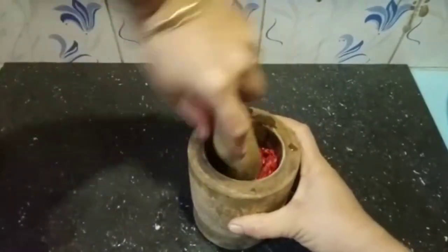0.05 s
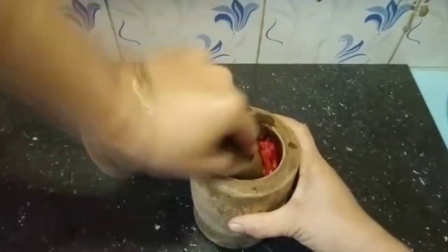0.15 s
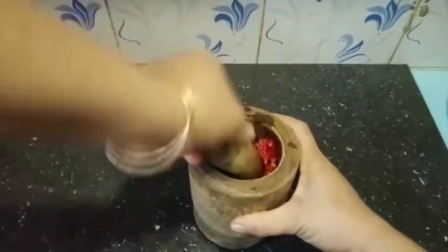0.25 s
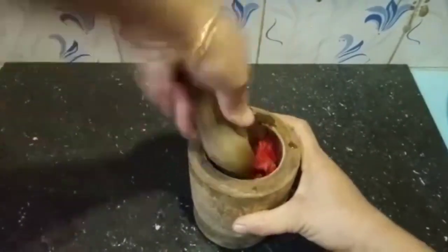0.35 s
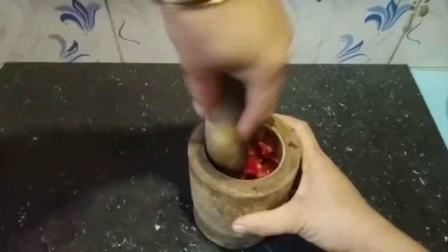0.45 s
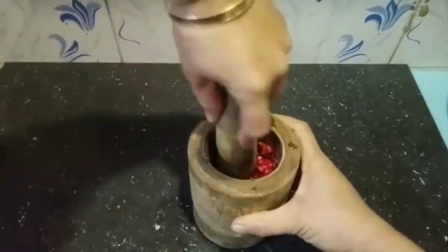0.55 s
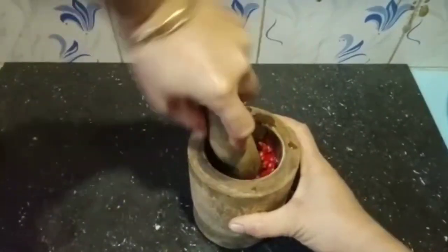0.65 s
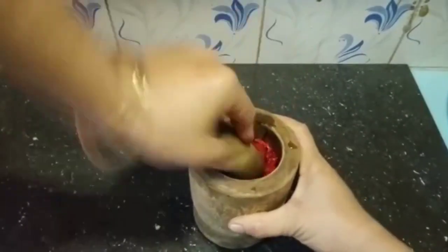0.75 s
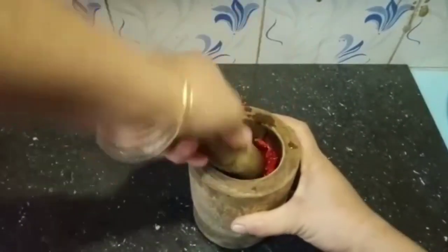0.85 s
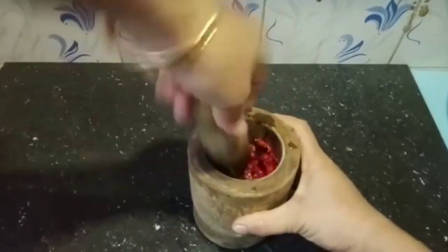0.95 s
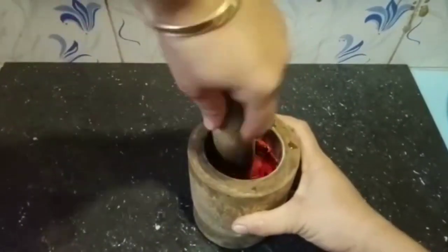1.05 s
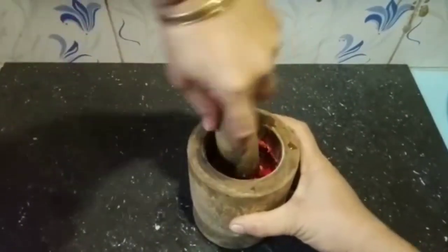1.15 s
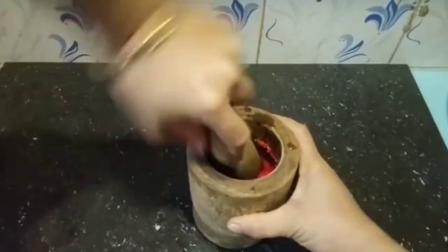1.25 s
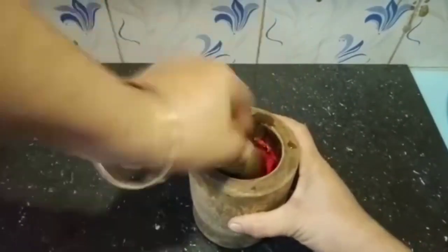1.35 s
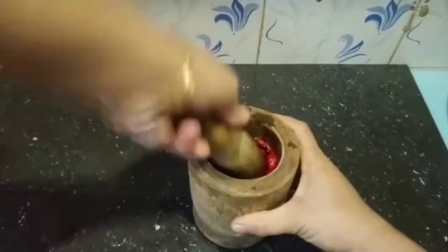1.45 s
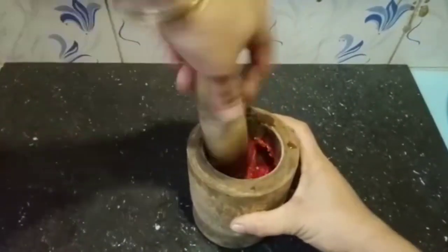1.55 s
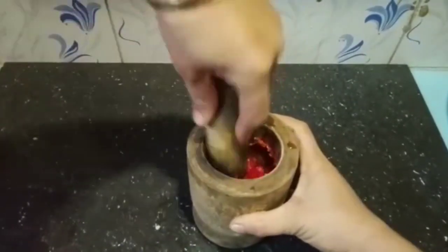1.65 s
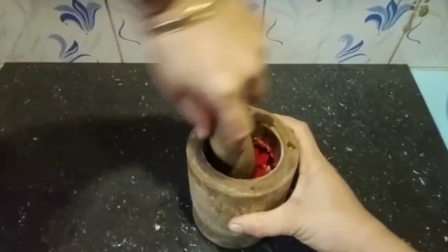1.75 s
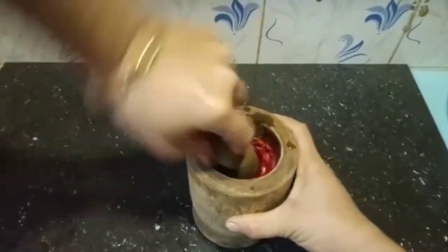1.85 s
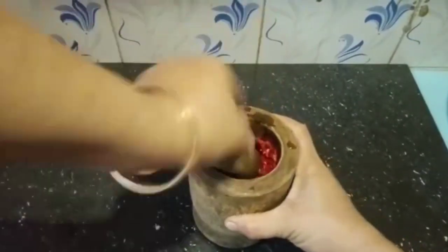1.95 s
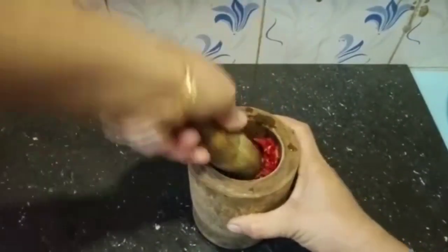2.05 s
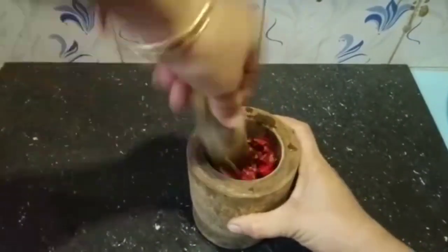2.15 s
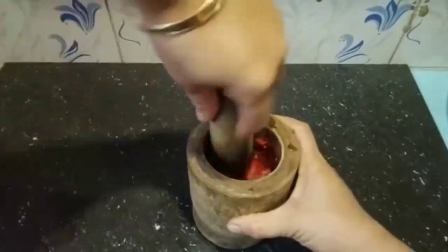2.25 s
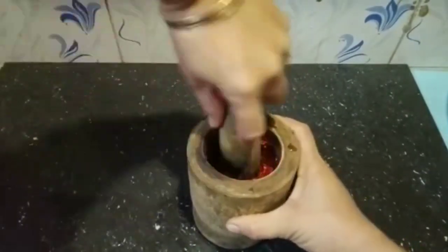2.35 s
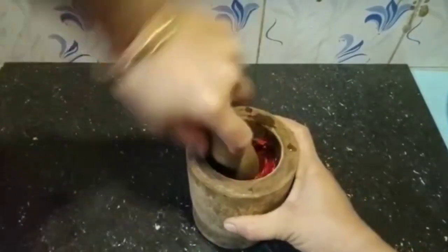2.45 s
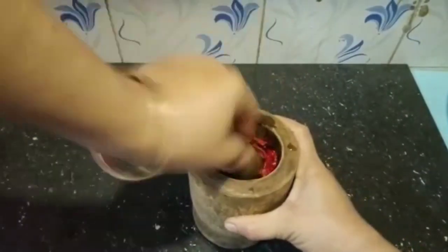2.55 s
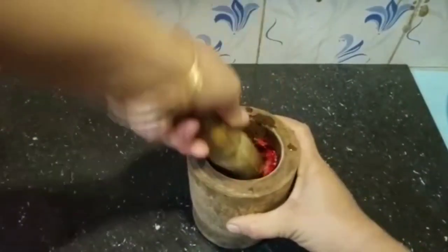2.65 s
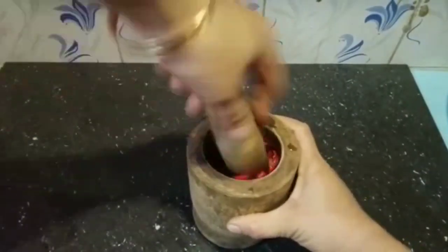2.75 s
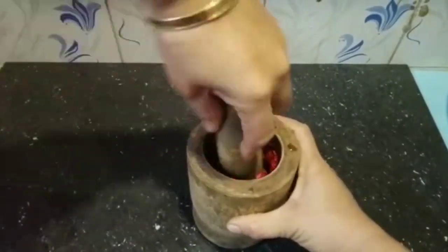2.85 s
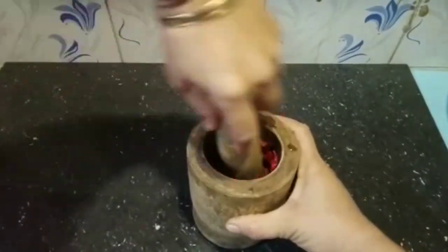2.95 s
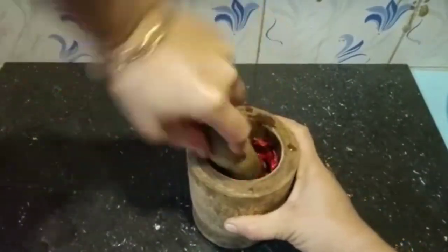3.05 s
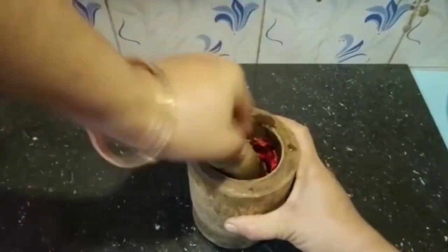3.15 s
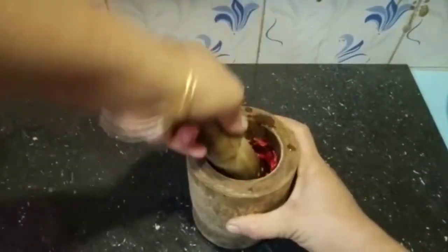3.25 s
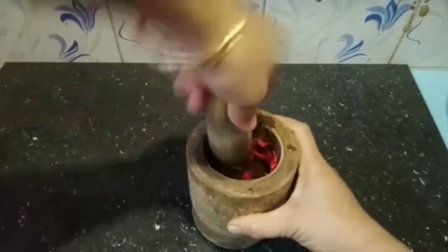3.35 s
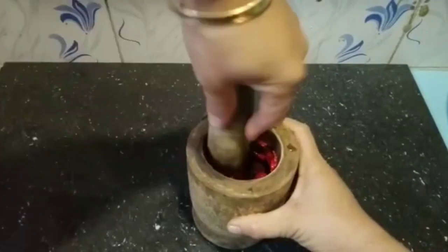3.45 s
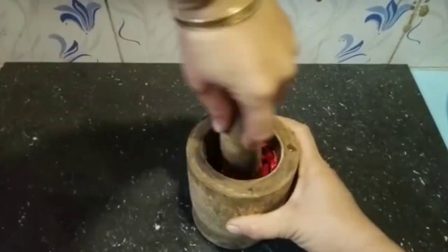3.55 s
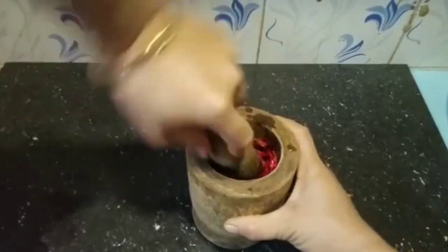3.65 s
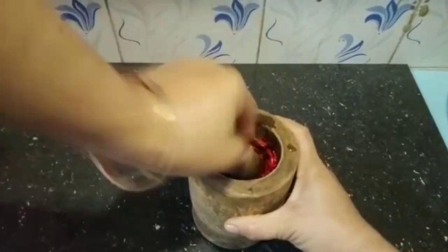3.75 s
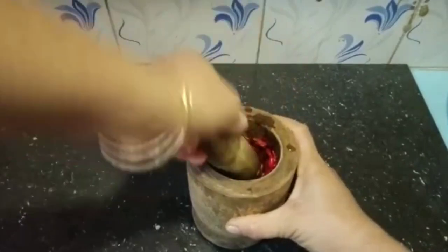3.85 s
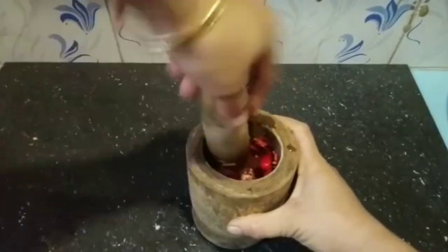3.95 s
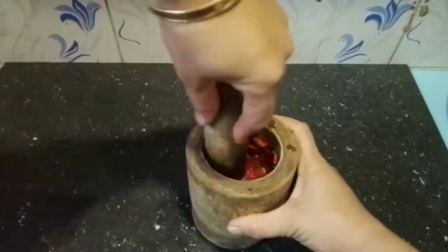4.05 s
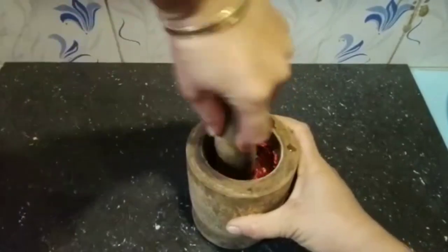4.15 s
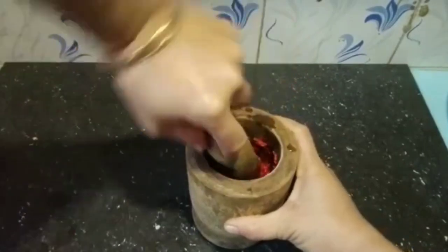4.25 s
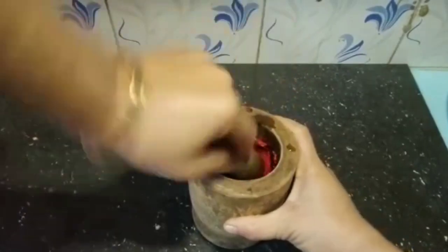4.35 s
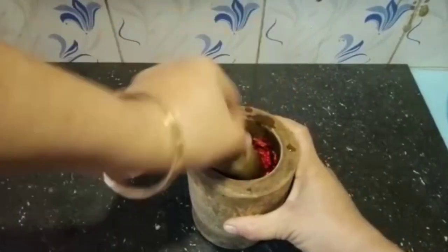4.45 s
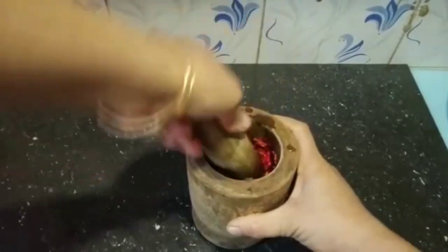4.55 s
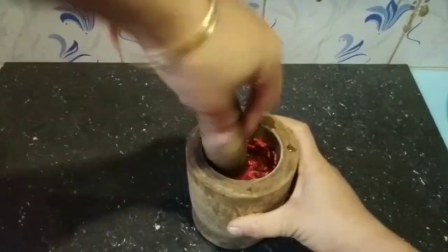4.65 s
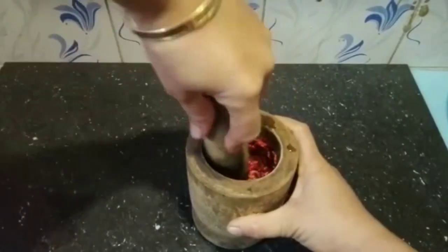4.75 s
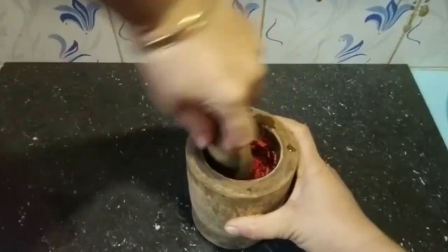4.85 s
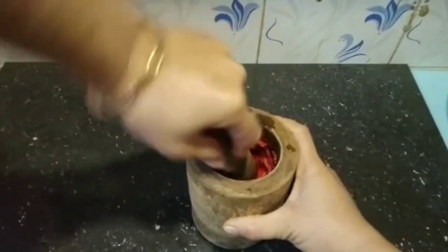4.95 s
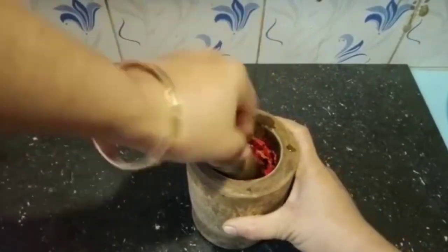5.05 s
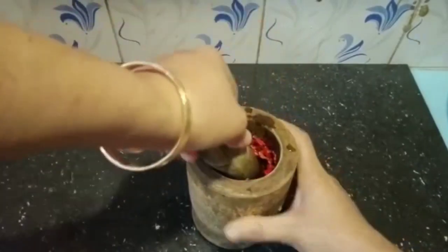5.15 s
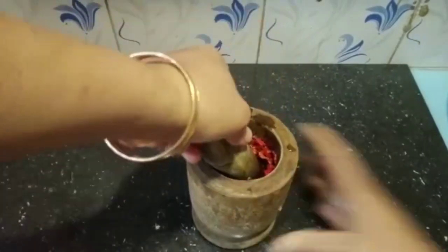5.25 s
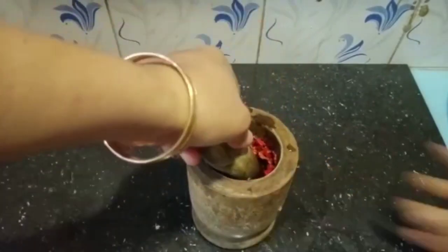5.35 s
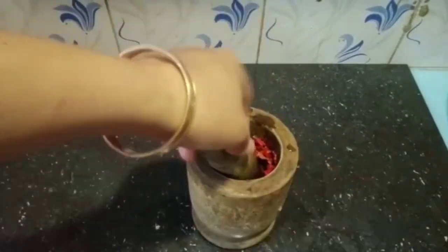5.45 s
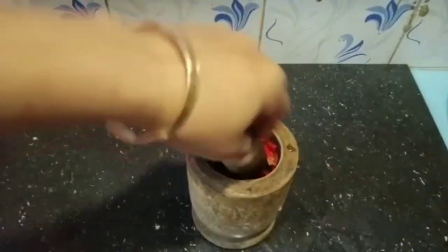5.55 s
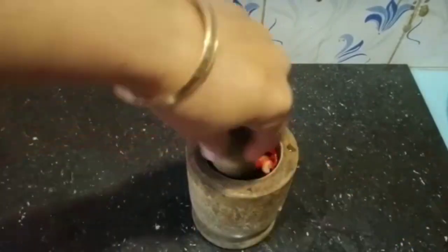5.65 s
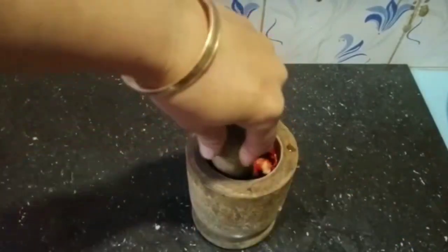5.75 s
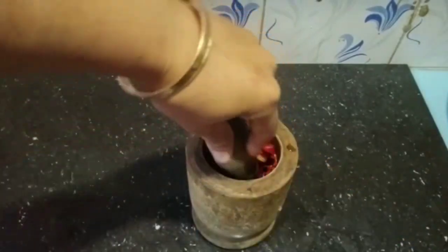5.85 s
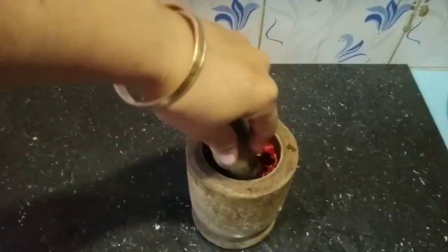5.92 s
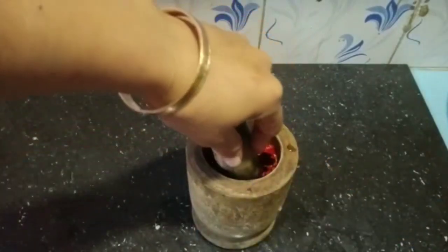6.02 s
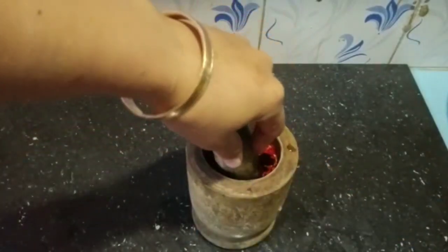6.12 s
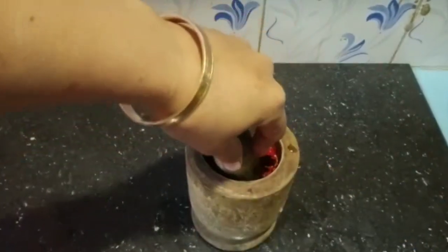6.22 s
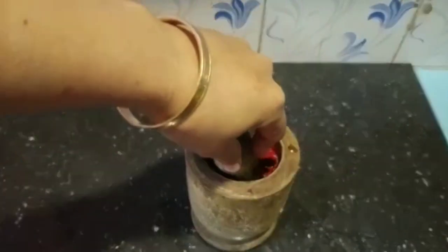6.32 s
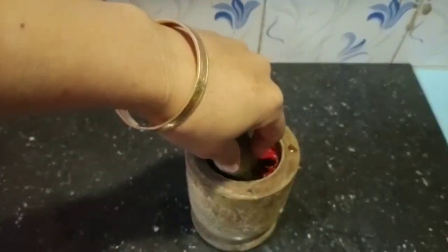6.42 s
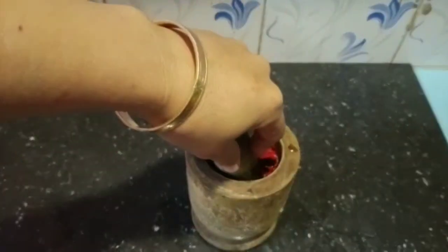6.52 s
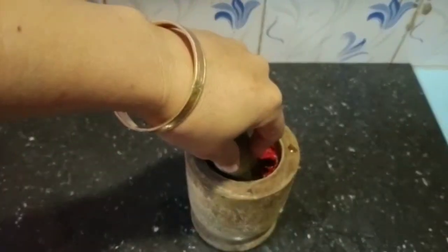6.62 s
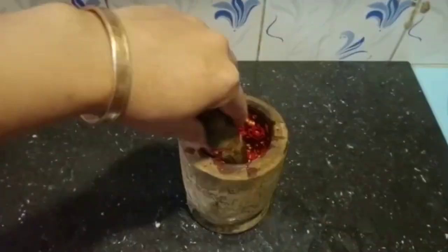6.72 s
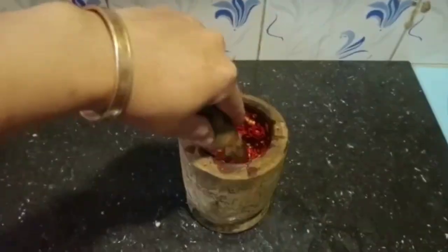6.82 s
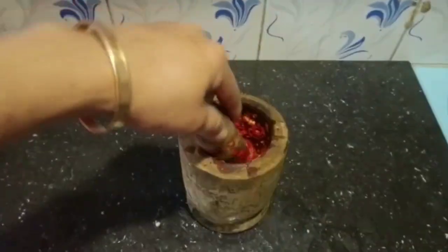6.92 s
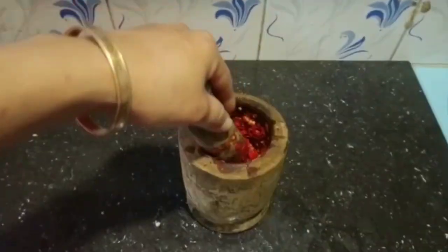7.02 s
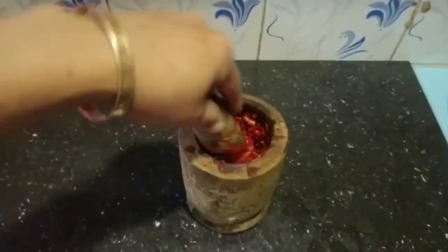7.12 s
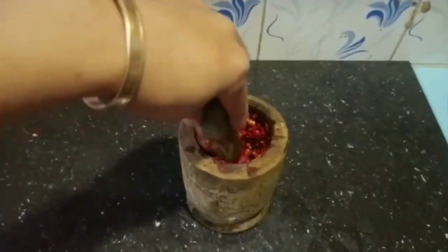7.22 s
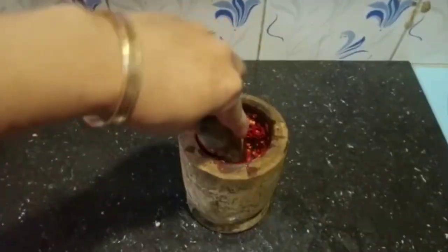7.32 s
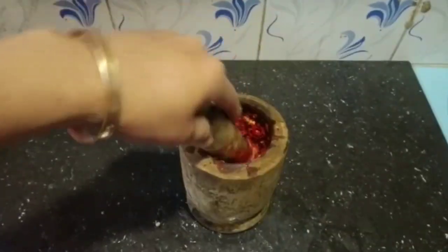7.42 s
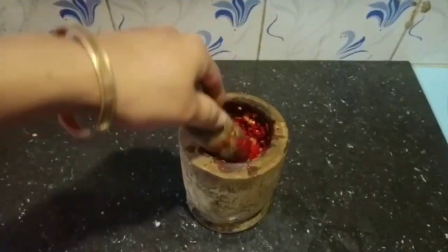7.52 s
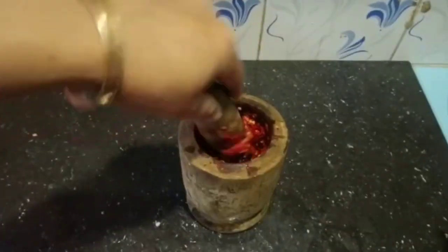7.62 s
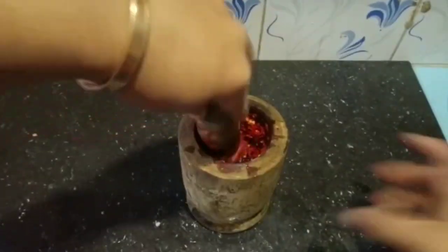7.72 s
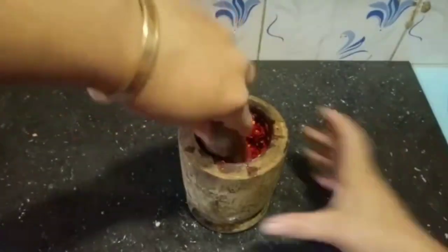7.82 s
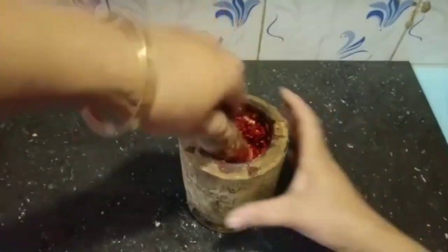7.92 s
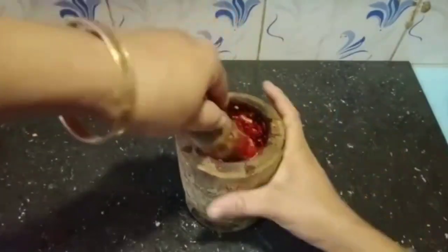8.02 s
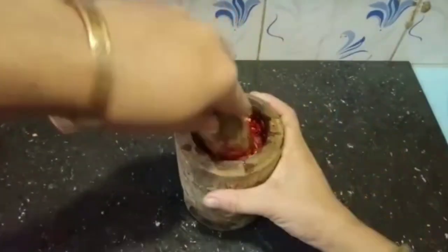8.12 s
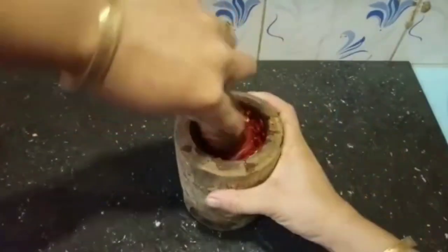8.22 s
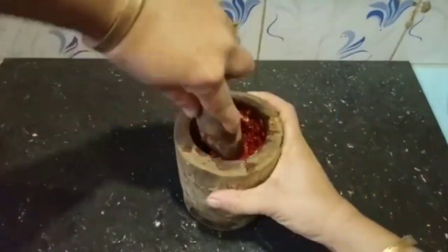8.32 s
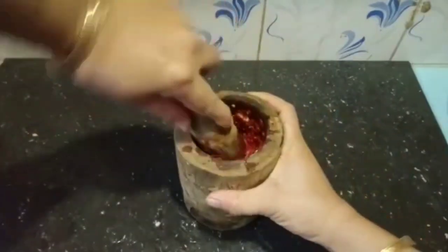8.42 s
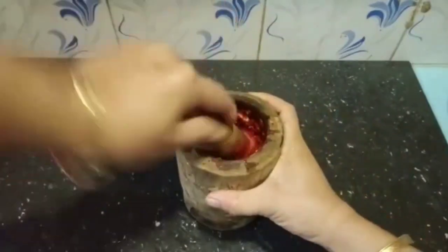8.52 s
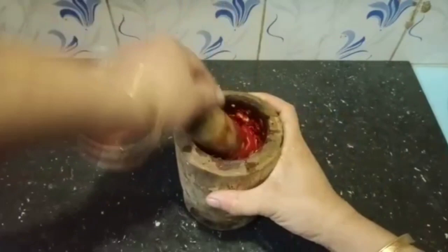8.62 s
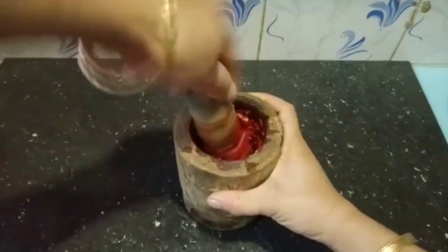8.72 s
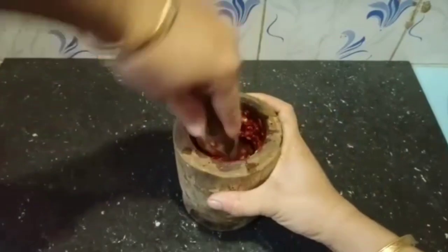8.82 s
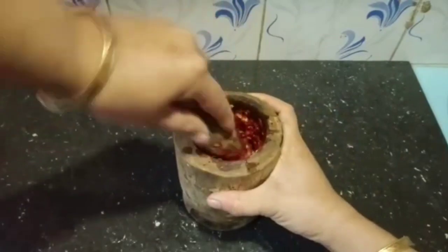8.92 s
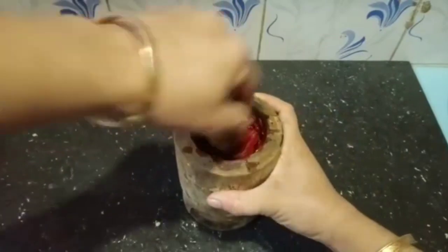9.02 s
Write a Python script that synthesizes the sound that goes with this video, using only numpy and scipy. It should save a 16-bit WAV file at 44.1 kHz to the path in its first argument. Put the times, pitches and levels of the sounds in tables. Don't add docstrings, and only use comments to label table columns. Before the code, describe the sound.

Wooden pestle pounds and grinds chillies in a wooden mortar over steady high hiss, then the hiss drops and gentler taps follow in quiet.

```python
import sys
import numpy as np
from scipy import signal
from scipy.fft import rfft, irfft, next_fast_len
from scipy.io import wavfile
from scipy.ndimage import uniform_filter1d

SR = 44100
rng = np.random.default_rng(int(sys.argv[2]) if len(sys.argv) > 2 else 0)


def gain_from_db(level_db):
    decades = np.asarray(level_db, float) / 20
    return 10 ** decades


def file_out(sig):
    cols = np.atleast_2d(sig).T
    lim = np.clip(cols, -1, 1)
    pcm = np.round(lim * 32767).astype(np.int16)
    wavfile.write(sys.argv[1], SR, pcm)


N = 400428
T = np.arange(N) / SR
CHANGE_S = 6.675
BEFORE = T < CHANGE_S


def level(x, db):
    return x * gain_from_db(db) / np.sqrt(np.mean(x ** 2))


def curve(table):
    s, db = np.transpose(table)
    return np.interp(T, s, db)


def spectrum_at(table, hz):
    table = np.array(table)
    return np.interp(np.log(hz), np.log(table[:, 0]), table[:, 1])


def band(x, lo_hz, hi_hz):
    return signal.sosfilt(signal.butter(2, [lo_hz, hi_hz], "bandpass", fs=SR, output="sos"), x)


def coloured(colour, lo_hz=1, hi_hz=SR):
    size = next_fast_len(N, True)
    hz = np.maximum(np.fft.rfftfreq(size, 1 / SR), 1)
    gain = gain_from_db(spectrum_at(colour, hz)) * (hz > lo_hz) * (hz <= hi_hz)
    return level(irfft(rfft(rng.standard_normal(N), size) * gain, size)[:N], 0)


def walk(rate_hz):
    k = int(SR / rate_hz)
    held = np.repeat(rng.standard_normal(N // k + 1), k)
    return 1.3 * uniform_filter1d(uniform_filter1d(held, k), k)[:N]


def patchy(x, spread_db):
    z = signal.stft(x, nperseg=512)[2]
    field = uniform_filter1d(rng.standard_normal(z.shape), size=3, axis=0)
    field = uniform_filter1d(field, size=5, axis=1)
    return level(signal.istft(z * gain_from_db(spread_db * field / field.std()), nperseg=512)[1][:N], 0)


def streaky(x, spread_db):
    z = signal.stft(x, nperseg=1024)[2]
    field = uniform_filter1d(rng.standard_normal(z.shape), size=50, axis=1)
    return signal.istft(z * gain_from_db(spread_db * field / field.std()), nperseg=1024)[1][:N]


def swells(rows, rise_db_s, fall_db_s):
    t = np.arange(0, N, 32) / SR
    s, held, db = np.transpose(rows)[:, :, None]
    db = db - rise_db_s * np.maximum(s - t, 0) - fall_db_s * np.maximum(t - s - held, 0)
    power = np.sum(gain_from_db(np.maximum(db, -150)) ** 2, axis=0)
    return np.interp(T, t, 10 * np.log10(power))


def ring(modes, extra_db, damp=0.8):
    hz, db, t60 = np.transpose(modes)
    t = np.arange(SR // 10)[:, None] / SR
    sense = (-1) ** np.arange(len(hz))
    decay = gain_from_db(-60 * t / (damp * t60))
    return np.sum(sense * gain_from_db(db + extra_db) * np.sin(2 * np.pi * hz * t) * decay, axis=1)


def grains(rate_hz, spread_db):
    slips = (rng.random(N) < rate_hz / SR) * rng.standard_normal(N)
    return slips * gain_from_db(spread_db * rng.exponential(size=N))


def add(out, x, s, db):
    i = int(s * SR)
    x = x[:len(out) - i]
    out[i:i + len(x)] += x * gain_from_db(db) / np.max(np.abs(x))


def floor_db(db, fade_db_s, quiet_db, recover_db):
    fade_from_s, recover_s = 4.52, 1
    fading = np.maximum(T - fade_from_s, 0)
    recovery = recover_db * np.exp(-np.maximum(T - CHANGE_S, 0) / recover_s)
    return np.where(BEFORE, db - fade_db_s * fading, quiet_db + recovery)


# (frequency [Hz], density [dB per Hz])
HISS_COLOUR = [(2650, -47), (4500, -14), (4840, -30), (5610, -8.5), (6000, -8), (7050, 2), (7630, 1.5),
               (8830, 3.5), (9550, -2), (10300, -1), (11900, -9), (14700, -2), (15700, -0.5)]
# (time [s], level [dB])
WHISTLE = [
    (5.0, -89),
    (5.5, -65.5),
    (6.17, -71),
    (6.27, -98),
]


def hiss():
    split_hz = 11300
    low_db = floor_db(-50.5, 1.83, -62, -1.8) + 0.9 * walk(6.7) * BEFORE
    top_db = floor_db(-51, 0.5, -61.5, -1.8) + 0.7 * walk(6)
    low = patchy(coloured(HISS_COLOUR, 4500, split_hz), 2.4) * gain_from_db(low_db)
    top = patchy(coloured(HISS_COLOUR, split_hz), 1.8) * gain_from_db(top_db)
    whistle = level(band(rng.standard_normal(N), 3620, 3800), 0)
    whistle *= gain_from_db(curve(WHISTLE) + 1.6 * walk(7.4))
    return streaky(low + top, 2.6) * gain_from_db(-0.85) + whistle


# (frequency [Hz], density [dB per Hz])
HUM_COLOUR = [(15, -52.5), (25, -9), (97, -8.5), (291, -6.5), (349, -1), (429, -5), (664, -11), (779, -9.5),
              (1260, -12.5), (1910, -14), (3710, -13), (4770, -16.5), (6000, -8.5), (7800, -38),
              (13200, -120)]
# (frequency [Hz], density [dB per Hz])
QUIET_COLOUR = [(15, -50), (25, -12), (65, -15), (90, -4.5), (1100, -12), (2040, -7), (2690, -9.5),
                (3710, -5), (4770, -9), (6000, -10), (7800, -31), (13200, -120)]


def kitchen_air():
    air = np.where(BEFORE, coloured(HUM_COLOUR, 1, 6000), coloured(QUIET_COLOUR, 1, 6000))
    return patchy(air, 2.5) * gain_from_db(floor_db(-59.5, 2, -70, -4.5) + 0.22 * walk(8))


# (time [s], level [dB])
SWISH = [
    (6.25, -79),
    (6.4, -67),
    (6.6, -66.5),
    (6.67, -72),
]


def sleeve():
    return BEFORE * level(band(rng.standard_normal(N), 1500, 2500), 0) * gain_from_db(curve(SWISH))


# (start [s], held [s], level [dB])
PUFFS = [(0.05, 0.052, -61), (2.77, 0.054, -63), (3.07, 0.043, -50), (4.39, .16, -51), (4.57, 0.066, -49.5),
         (4.66, 0.023, -51.5), (5.005, 0.11, -43), (5.23, 0.071, -50.5), (5.45, 0.037, -68),
         (5.65, 0.07, -63.5)]
# (frequency [Hz], density [dB per Hz])
PUFF_COLOUR = [(12, -49.5), (20, -13), (44, -13.5), (91, -2), (175, -3), (210, -15.5), (260, -22.5),
               (340, -48), (570, -120)]


def puffs():
    jolt_db, jolt_share, jolt_s = -61.5, 0.25, 0.03
    rise_db_s, fall_db_s = 347, 296.5
    quiet_jolt_db, draught_db = -15, -75
    jolts = [(s, jolt_s, jolt_db + jolt_share * db) for s, db, *_ in BLOWS + LATER_BLOWS]
    gusts = gain_from_db(swells(PUFFS + jolts, rise_db_s, fall_db_s))
    gusts = gusts * np.where(BEFORE, 1, gain_from_db(quiet_jolt_db)) + gain_from_db(draught_db) * BEFORE
    return coloured(PUFF_COLOUR, 1, 240) * gusts * gain_from_db(4.4 * walk(57))


def background():
    duck_db, duck_s = -0.5, 0.28
    s, db = np.transpose(BLOWS)[:2]
    press = np.bincount((s * SR).astype(int), gain_from_db(db - db.max()), N)
    duck = duck_db * signal.lfilter([1], [1, -np.exp(-1 / (duck_s * SR))], press)
    return (hiss() + kitchen_air()) * gain_from_db(duck) + sleeve() + puffs()


# (frequency [Hz], t60 [s])
KITCHEN = [(150, 0.14), (500, 0.31), (1800, 0.4), (5000, 0.18)]


def echoes(count):
    kitchen_db = -13
    t, tail = np.arange(SR // 3) / SR, 0
    for hz in 125 * 2.0 ** np.arange(7):
        octave = band(rng.standard_normal((count, len(t))), hz / np.sqrt(2), hz * np.sqrt(2))
        tail = tail + octave * gain_from_db(-60 * t / spectrum_at(KITCHEN, hz))
    tail = tail * np.clip(t / 0.009, 0, 1)
    tail = tail * gain_from_db(kitchen_db) / np.sqrt(np.sum(tail ** 2, axis=1, keepdims=True))
    tail[:, 0] = 1
    return tail


# (time [s], peak level [dB], centre [Hz])
TICKS = [(1.099, -43, 2950), (2.11, -52, 4200), (3.000, -41, 3000), (3.227, -50, 4000), (3.707, -43, 4100),
         (4.079, -44, 10500), (4.128, -35.5, 3250), (4.232, -36, 9500), (4.316, -36, 7760),
         (4.982, -36, 8750), (5.113, -45, 3200), (5.460, -50.5, 2630), (5.885, -43.5, 3200),
         (5.925, -52, 3080), (8.84, -60, 1350)]


def ticks():
    out, t = np.zeros(N), np.arange(SR // 40) / SR
    for (s, db, hz), snap in zip(TICKS, rng.standard_normal((len(TICKS), len(t)))):
        add(out, band(snap * np.exp(-t / 0.0074), 0.87 * hz, 1.1 * hz), s, db)
    return out


# (time [s], peak level [dB], rasp against the peak [dB], length [s])
SCUFFS = [(0.319, -58, 13, 0.018), (0.465, -58, -8, 0.016), (0.505, -44, 2, 0.034),
          (0.538, -42.5, 7, 0.036), (1.08, -38, -4, 0.031), (1.316, -45.5, 2.5, 0.02),
          (2.295, -39.5, -26, 0.01), (2.445, -35, -13, 0.012), (2.782, -53.5, 5.5, 0.053),
          (2.892, -41.5, -4, 0.017), (3.457, -49, 2, 0.0093), (3.506, -42, 3, 0.019),
          (3.522, -39, 4.5, 0.028), (4.14, -26.5, -9, 0.015), (4.75, -48.5, -9, 0.02),
          (4.8, -38.5, 2, 0.033), (5.076, -56, 12, 0.012), (5.457, -61.5, 4, 0.036),
          (5.883, -56, -3, 0.029)]
# (frequency [Hz], level [dB], t60 [s])
SHAFT = [(1239, 13.5, 0.026), (1288, -15, 0.021), (1917, -23.5, 0.02), (3000, -2.5, 0.032),
         (4000, -18.5, 0.1)]


def scuffs():
    out, t = np.zeros(N), np.arange(SR // 10) / SR
    for (s, db, rasp_db, length_s), rub in zip(SCUFFS, rng.standard_normal((len(SCUFFS), len(t)))):
        fade = np.clip(1 - t / max(length_s, 0.003), 0, 1) ** 0.3
        rub = rub * np.clip(t / 0.0015, 0, 1) * fade
        add(out, signal.fftconvolve(rub, ring(SHAFT, 0)), s - 0.001, db + 5)
        rub = rub * np.abs(rub) ** 0.48
        rasp = band(rub, 2000, 4500) - 0.45 * band(rub, 4500, 12500)
        add(out, rasp, s - 0.001, db + rasp_db + 5.5)
    return out


# (start [s], held [s], pressure on the bowl [dB], grit [dB])
STROKES = [(0.0, 0.015, -45.5, -40), (0.11, 0.065, -44.5, -48.5), (0.37, 0.01, -35, -55),
           (0.42, 0.044, -36, -61), (0.6, 0.025, -46.5, -47), (0.7, 0.076, -47, -49.5),
           (0.955, 0.057, -32.5, -44.5), (1.15, 0.12, -51, -50.5), (1.288, 0.037, -40.5, -47),
           (1.575, .08, -40.5, -44.5), (1.67, .04, -54, -47), (1.845, 0.097, -45.5, -45),
           (2.09, .11, -35, -48), (2.24, 0.038, -45, -46.5), (2.4, 0.085, -46.5, -52),
           (2.52, 0.058, -44, -49.5), (2.802, 0.075, -45.5, -56), (3.05, 0.1, -42, -51),
           (3.28, .07, -62, -52), (3.45, 0.034, -52, -49), (3.52, 0.016, -49, -48), (3.66, .11, -50, -52.5),
           (4.0, 0.013, -42, -58), (4.075, 0.022, -40, -48), (4.26, 0.068, -46.5, -45.5),
           (4.37, 0.073, -47.5, -51.5), (4.528, .02, -56, -69), (4.69, 0.088, -45.5, -55),
           (4.93, 0.1, -49, -49.5), (5.132, 0.075, -58, -61)]
# (centre [Hz], width [Hz], level [dB])
SEEDS = [
    (2237, 1100, 2),
    (3000, 980, -1.5),
    (4050, 900, -2),
]


def grinding():
    bite_db_s, ease_db_s, grit_ease_db_s = 403, 251.5, 122
    shaft_gain_db, pressure_share = -9, 0.26
    resting = (0.023, 5.1, -61.5, -61.5)
    strokes = np.array(STROKES + [resting])
    bowl_db = swells(strokes[:, :3], bite_db_s, ease_db_s)
    seeds_db = swells(strokes[:, [0, 1, 3]], bite_db_s, grit_ease_db_s)
    shaft_db = shaft_gain_db + pressure_share * bowl_db + (1 - pressure_share) * seeds_db

    slips = grains(2500, 2.4) * gain_from_db(2.4 * walk(60))
    tilt_db = -4 * np.log2(np.array(BOWL)[:, 0] / 400)
    bowl = level(signal.fftconvolve(slips, ring(BOWL, tilt_db, damp=0.6))[:N], -0.96)
    squeak = level(band(slips, 1960, 2140), -18) + level(band(slips, 3900, 4100), -26)

    shaft_slips = grains(2500, 2.4) * gain_from_db(1.5 * walk(27))
    shaft = signal.fftconvolve(shaft_slips, ring(SHAFT[:2], 0, damp=0.78))[:N]

    seeds = np.zeros(N)
    for hz, width_hz, db in SEEDS:
        crunch = grains(3000, 1.5) * gain_from_db(2.5 * walk(25))
        seeds += gain_from_db(db) * band(crunch, hz - width_hz / 2, hz + width_hz / 2)
    out = (bowl + squeak) * gain_from_db(bowl_db)
    out += level(shaft, -1.4) * gain_from_db(shaft_db)
    return out + level(seeds, -7.5) * gain_from_db(seeds_db)


# (time [s], knock peak level [dB], then against the knock: thud [dB], hollow [dB], hardness [dB])
BLOWS = [(0.046, -25.5, 0.5, -6, -29), (0.296, -43, 1, -6, -11), (0.347, -20.5, -29, -17, -3),
         (0.571, -25, -2.5, -20, -24), (0.884, -53.5, 9, 0, 14), (1.114, -23, -7, -4, -6.5),
         (1.545, -4.5, -15, -23, -4.5), (1.752, -20.5, -5.5, -13, -12.5), (2.05, -11.5, -14.5, -4, -8),
         (2.348, -20.5, -8.5, -5.5, -16), (2.525, -47, 11, 7, -13), (2.646, -36.5, -3, 11, -4.5),
         (2.813, -35.5, 1.5, 1, -13), (3.018, -19, -7.5, 0, -9.5), (3.377, -38.5, 5.5, -6, -11),
         (3.624, -21.5, -6.5, -7.5, -16.5), (3.884, -26, -5.5, -18, -10.5), (3.959, -18, -11.5, -0.5, -3.5),
         (4.231, -19, -7.5, -18, -9.5), (4.649, -17, -16, -4.5, -5), (4.897, -21, -8, -9, -3)]
LATER_BLOWS = [(7.193, -48.5, -10, -3.5, -6), (7.287, -70, 7.5, 1, 3), (7.381, -60, -1.5, -3, -7),
               (7.536, -36.5, -9, -4.5, -6.5), (7.949, -53, -12, -5, -11.5), (8.002, -58, 3, 1, -16),
               (8.09, -28, -21, -11.5, -3.5), (8.406, -26.5, -27, -18, -37), (8.651, -55, -6.5, -4, -18),
               (8.777, -35.5, -10, -3, -8), (8.908, -30.5, -21.5, -2.5, -10)]
# (frequency [Hz], level [dB], t60 [s])
BOWL = [(178.8, -15, 0.12), (344.5, -3, 0.092), (447, -6, 0.018), (421.5, 10, 0.081), (579, 7, 0.066),
        (665.4, 12, 0.046), (690, -20, .05), (800, -16.5, 0.065), (926.3, -14, 0.042), (1076, -8.5, 0.036),
        (1284, -10, 0.029), (1447, -11, 0.022), (1520, -20.5, 0.054), (1722, -3.5, 0.0086),
        (2100, -16.5, 0.072), (2200, -11, .035), (2530, -17.5, 0.075), (2608, -18.5, 0.034),
        (3200, -38, .025), (3600, -25, 0.075)]
PARTS_HZ = [0, 410, 580, 920, 1900, 5000]


def blows():
    out, modes, t = np.zeros(N), np.array(BOWL), np.arange(SR // 40) / SR
    part = np.digitize(modes[:, 0], PARTS_HZ) - 1
    hits = BLOWS + LATER_BLOWS
    place_db = 1.5 * rng.standard_normal((len(hits), len(BOWL)))
    chatter = rng.standard_normal((len(hits), len(t)))
    for (s, db, thud_db, hollow_db, hard_db), here_db, rattle, echo in zip(
            hits, place_db, chatter, echoes(len(hits))):
        crack_db = hard_db - 13.5
        push = np.sin(np.pi * np.clip(t / 0.00042, 0, 1))
        push += 0.5 * rattle * np.exp(-(t / 0.013) ** 2)
        parts_db = [thud_db, min(hollow_db, 1) - 0.5, -0.3, min(hard_db, -1) - 0.7, crack_db]
        hit = np.zeros(SR // 2)
        for k, part_db in enumerate(parts_db):
            response = ring(modes[part == k], here_db[part == k], damp=0.81)
            add(hit, signal.fftconvolve(push, response), 0, db + part_db)
        add(hit, band(rattle, 1900, 5000) * np.exp(-t / 0.008), 0, db + crack_db)
        hit *= np.clip(np.arange(len(hit)) / SR / 0.00201, 0, 1)

        onset = hit[:len(t)] * np.exp(-t / 0.0025)
        onset *= np.sqrt(np.sum(hit ** 2) / np.sum(onset ** 2))
        tail = signal.fftconvolve(onset, echo[1:])
        hit[:len(tail)] += tail
        i = int((s - 0.0015) * SR)
        out[i:i + len(hit)] += hit[:N - i]
    return out


def scene():
    small = signal.butter(4, 200, "highpass", fs=SR, output="sos")
    rubbing = signal.fftconvolve(scuffs() + ticks() + grinding(), echoes(1)[0])[:N]
    return (signal.sosfilt(small, blows() + rubbing) + background())[None]


def low_pass(x):
    return signal.sosfilt(signal.butter(12, 16780, fs=SR, output="sos"), x)


def record(dry):
    bottom = signal.butter(2, 35, "highpass", fs=SR, output="sos")
    top = signal.ellip(8, 0.2, 70, 15750, fs=SR, output="sos")
    return low_pass(signal.sosfilt(np.vstack([bottom, top]), dry))


dry = scene()
out = record(dry)
file_out(out)
```